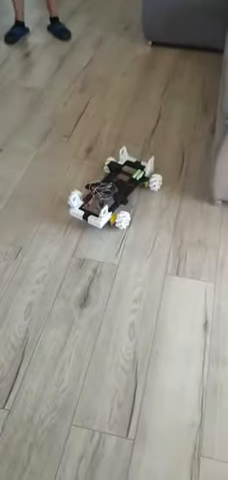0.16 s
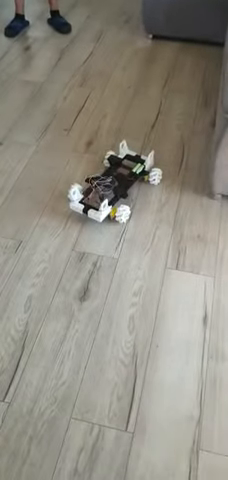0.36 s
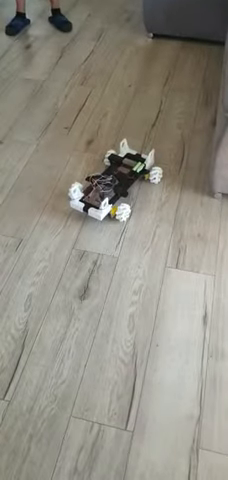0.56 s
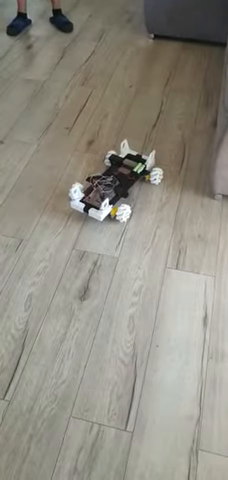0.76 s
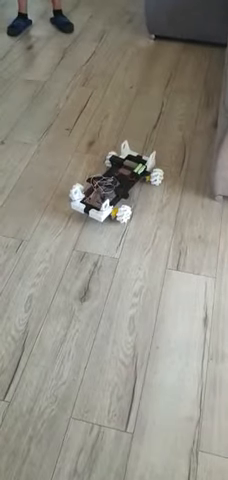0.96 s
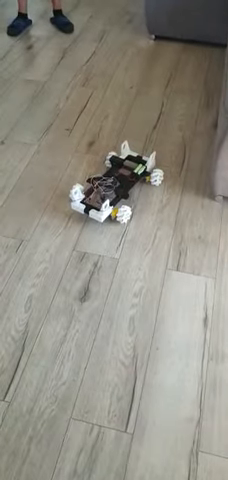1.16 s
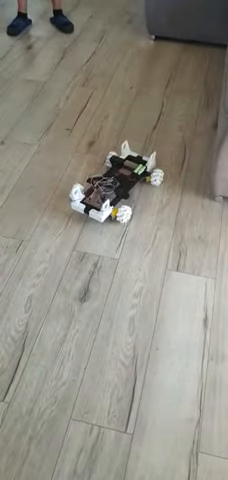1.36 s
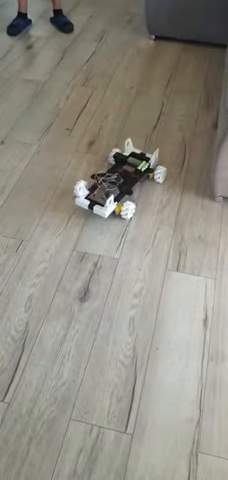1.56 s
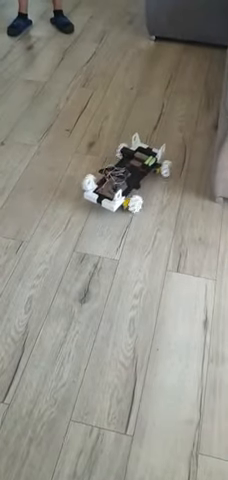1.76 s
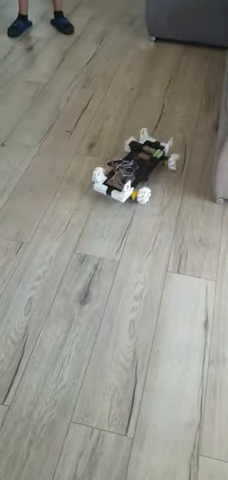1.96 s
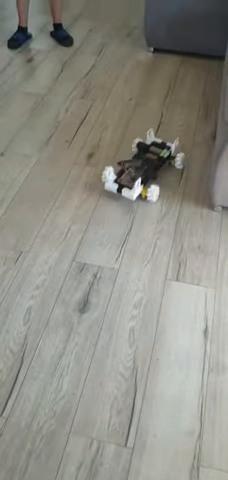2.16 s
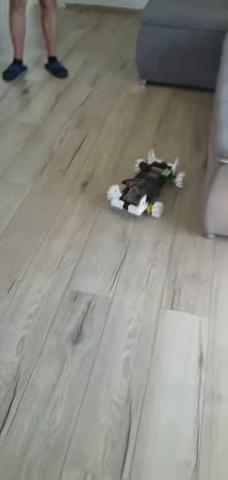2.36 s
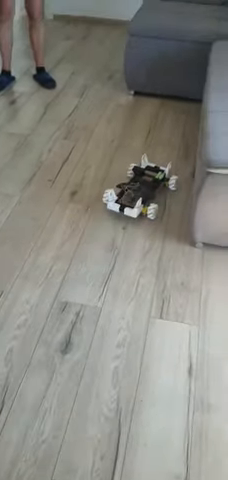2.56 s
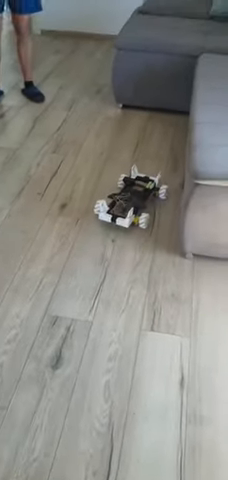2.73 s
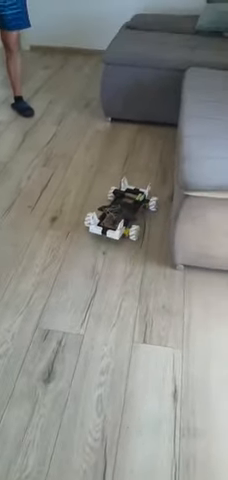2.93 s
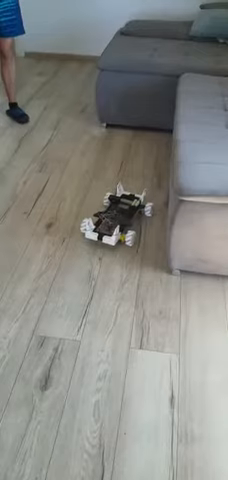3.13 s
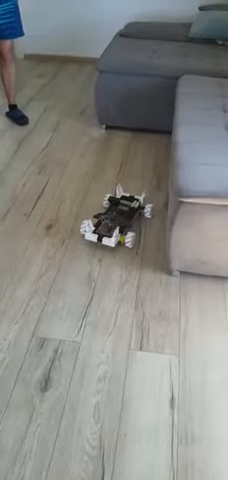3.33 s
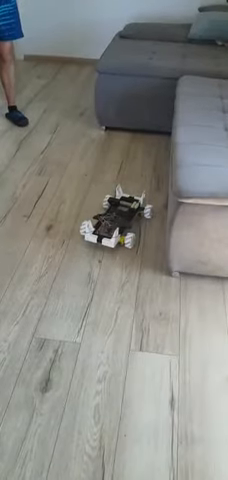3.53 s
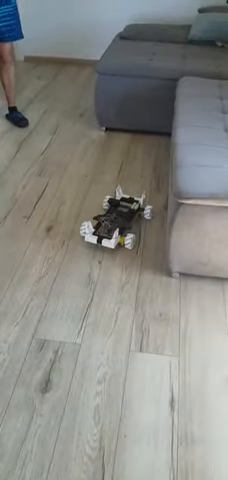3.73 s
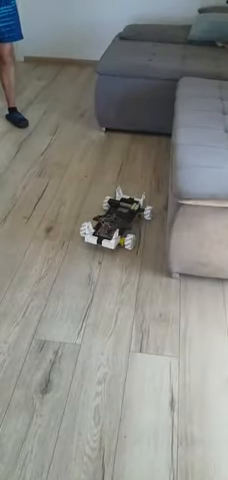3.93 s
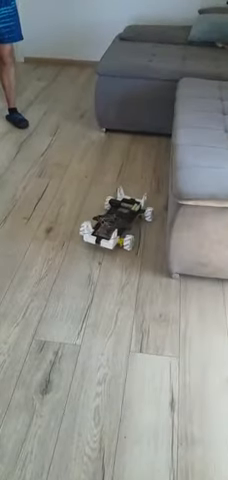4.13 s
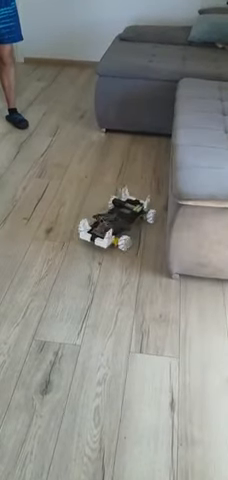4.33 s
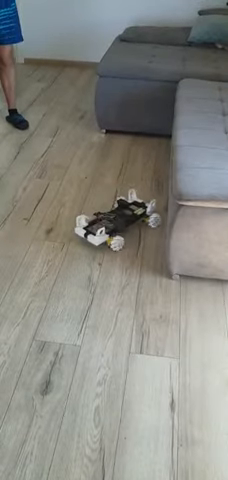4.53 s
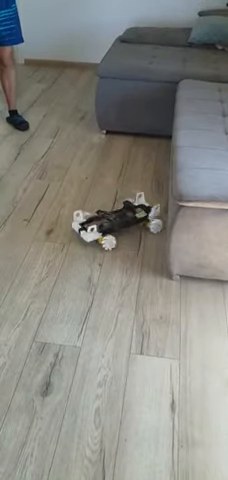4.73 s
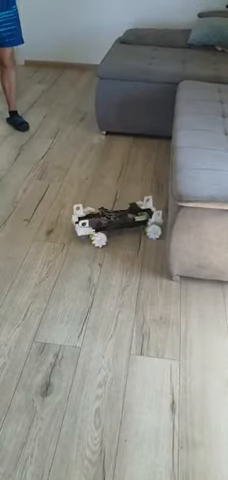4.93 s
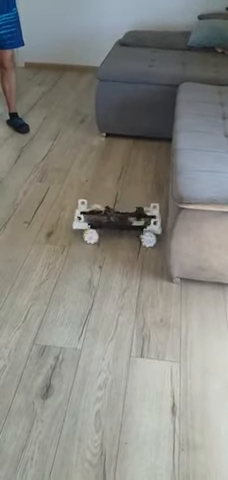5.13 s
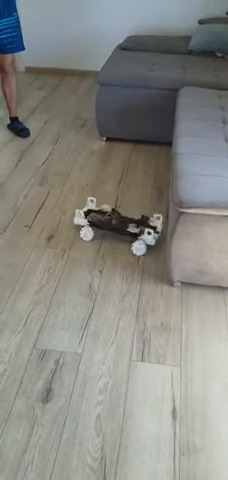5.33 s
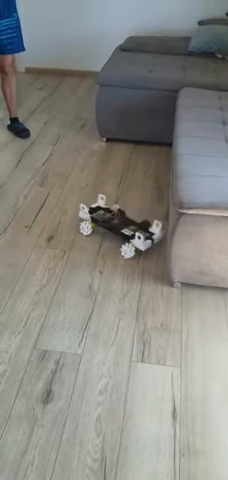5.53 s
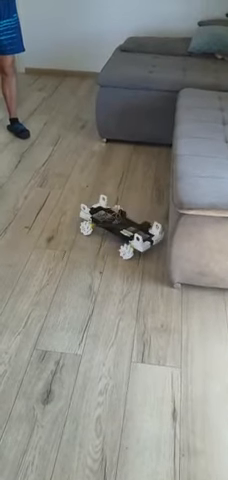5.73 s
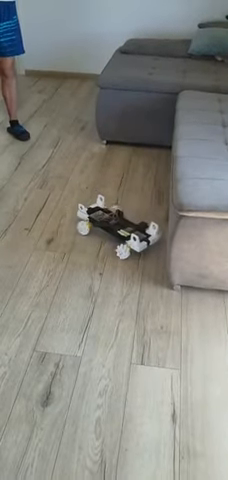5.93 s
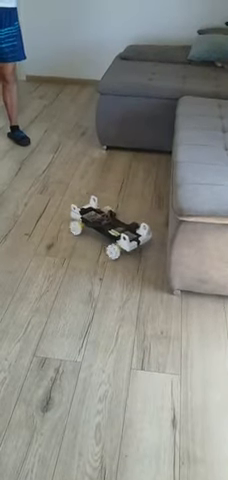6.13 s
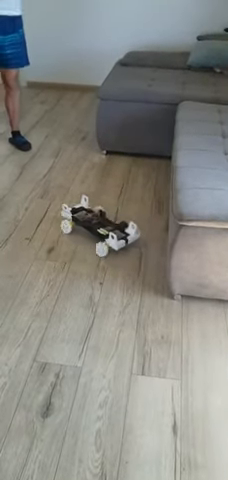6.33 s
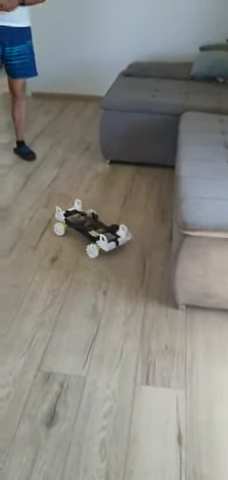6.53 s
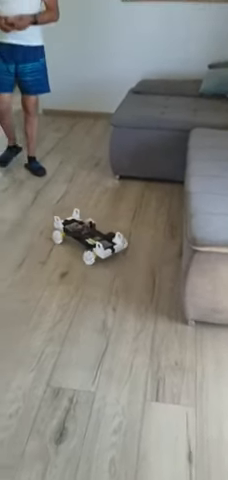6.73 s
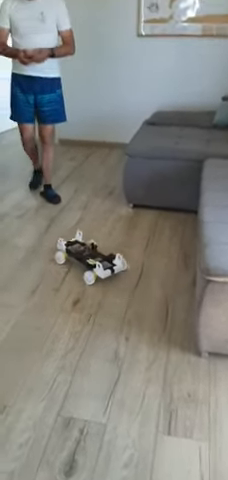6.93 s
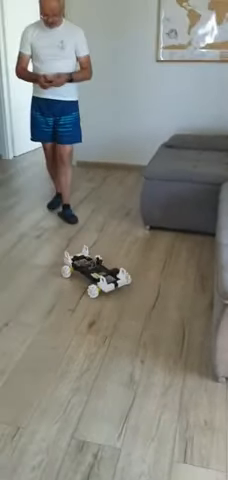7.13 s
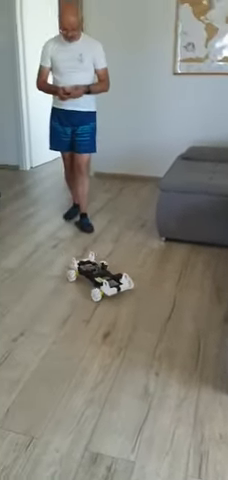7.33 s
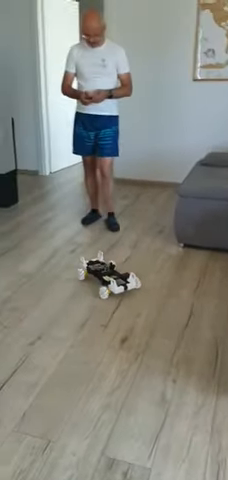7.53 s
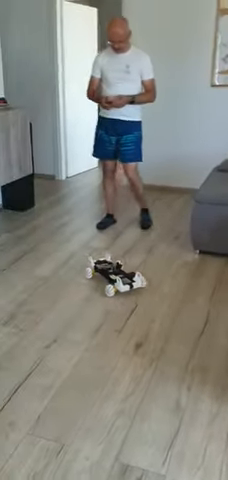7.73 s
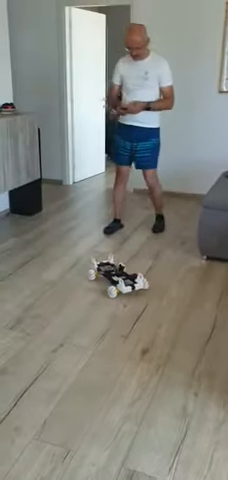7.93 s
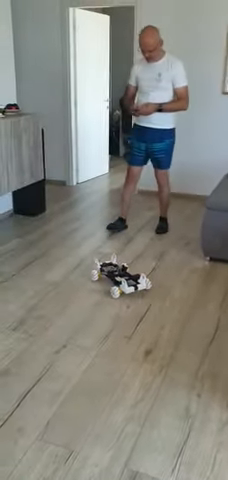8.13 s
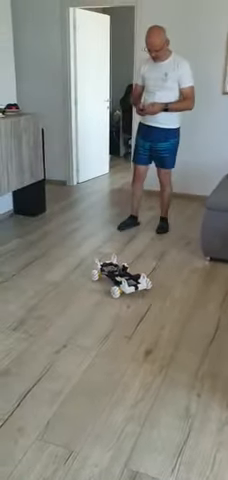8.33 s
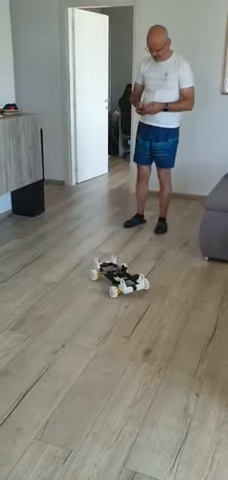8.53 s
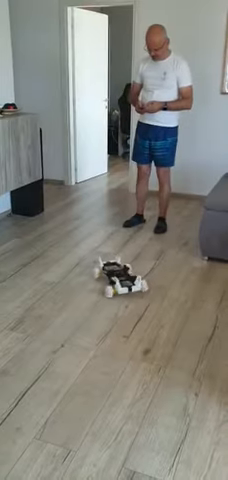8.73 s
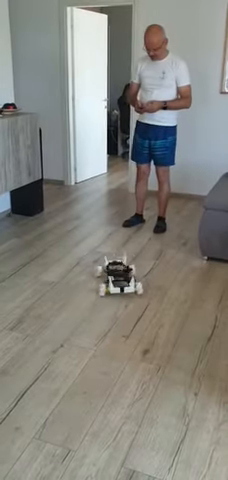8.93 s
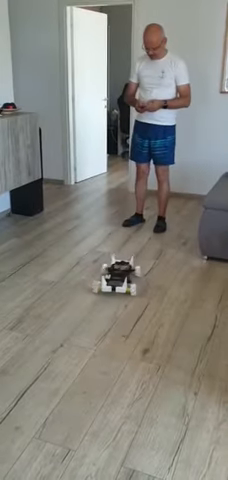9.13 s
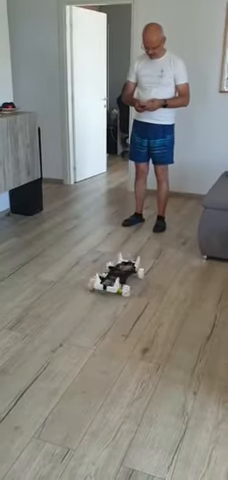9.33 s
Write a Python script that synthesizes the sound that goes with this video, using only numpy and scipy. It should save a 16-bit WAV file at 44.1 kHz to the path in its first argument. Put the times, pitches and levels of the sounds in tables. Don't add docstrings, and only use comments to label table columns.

```python
import sys
import numpy as np
from scipy import signal
from scipy.fft import rfft, irfft, next_fast_len
from scipy.io import wavfile
from scipy.ndimage import map_coordinates

SR = 44100
rng = np.random.default_rng(int(sys.argv[2]) if len(sys.argv) > 2 else 0)


def unload_audio(sound):
    columns = np.transpose(np.atleast_2d(sound))
    steps = np.round(np.clip(columns, -1, 1) * 32767)
    wavfile.write(sys.argv[1], SR, steps.astype(np.int16))


def convert_level_to_amplitude(level_db):
    exponent = np.asarray(level_db, float) / 20
    return 10 ** exponent


N = 418068

# (time [s], housing ring level [dB], tooth mesh re ring [dB], sizzle re ring [dB],
# chassis rumble level [dB], board drone level [dB])
DRIVES = [
    [(0.0, -68, -3, -21.5, -73, -77), (0.058, -75, -10, -28.5, -75.5, -79), (0.09, -80, -13, -20, -76, -78),
     (0.286, -103, 3, -5, -74, -76.5), (0.3, -100, 16, -3, -71, -71)],
    [(1.33, -83, 12, -5, -74.5, -70), (1.362, -41.5, -5, -10.5, -76, -68.5), (1.422, -50, 8, -13, -70, -64),
     (1.454, -36, -1, -8, -63, -59.5), (1.51, -40.5, 0, -10.5, -51, -51),
     (1.538, -28.5, -10, -9, -46.5, -52), (1.584, -36, 1.5, -14.5, -45.5, -51),
     (1.608, -31, -6, -10.5, -44, -47.5), (1.66, -38, -2.5, -9.5, -47, -53.5),
     (1.674, -29.5, -4, -15, -42.5, -47.5), (1.724, -35.5, -3.5, -11, -44.5, -48.5),
     (1.952, -26, -6, -9.5, -40, -48.5), (2.05, -31.5, -4.5, -9, -46, -48.5),
     (2.18, -30.5, -5.5, -10, -42.5, -49.5), (2.278, -31.5, -4, -9, -45.5, -48),
     (2.358, -35.5, -4.5, -12, -50.5, -51), (2.612, -62.5, 5.5, -15.5, -60.5, -67.5),
     (2.798, -69, 4, -23, -77, -78), (3.0, -104, -1, -10, -83, -80.5)],
    [(4.0, -73, -3, -17, -76.5, -72), (4.028, -42.5, -6, -20, -75, -71.5),
     (4.082, -52.5, 5, -12.5, -70, -63), (4.122, -31, -6.5, -12.5, -65, -68.5),
     (4.176, -44, 1, -8, -55.5, -57), (4.21, -23.5, -11, -13, -43, -48), (4.234, -36, -3, -12, -37, -47),
     (4.284, -30.5, -6, -9, -44, -48.5), (4.338, -32, -2, -12.5, -40.5, -43),
     (4.41, -29.5, -4.5, -9, -39, -48), (4.606, -30.5, -4, -9, -46, -46.5),
     (4.788, -32.5, -2, -13, -43, -47), (4.97, -31, -4, -7, -42, -45), (5.116, -31.5, -2, -12, -45, -54),
     (5.312, -31.5, -2, -9.5, -40.5, -46), (5.426, -29.5, -5, -9.5, -40.5, -48),
     (5.514, -43, 2, -15.5, -55, -54), (5.592, -51, 0.5, -11.5, -62.5, -62),
     (5.76, -70, -2, -19, -69, -73.5)],
    [(5.76, -64, 8, -20, -64, -66), (5.77, -54, 1, -27, -61.5, -66), (5.85, -44.5, 6, -20, -60.5, -55),
     (5.87, -32, -9, -21.5, -61, -61.5), (5.92, -42.5, 1, -12, -60.5, -56),
     (5.96, -32, -7.5, -8.5, -47, -54), (6.05, -35, 1, -14, -46.5, -54),
     (6.25, -30, -6.5, -9.5, -42.5, -51), (6.3, -32.5, 0.5, -6, -42.5, -44.5),
     (6.32, -22.5, -10, -10, -40.5, -44), (6.38, -31, -7, -12.5, -36.5, -45),
     (6.47, -26, -9.5, -12.5, -51, -46.5), (6.61, -35.5, 2.5, -6, -50, -50.5),
     (6.63, -24, -16, -13, -42, -51), (6.66, -32.5, -4, -8, -45, -44.5), (6.79, -28, -5.5, -9, -40, -43),
     (7.1, -31.5, -2.5, -11.5, -47.5, -44.5), (7.22, -26, -8.5, -10, -38, -33),
     (7.28, -30.5, -4, -9.5, -39, -40), (7.49, -30, -3, -10, -42, -37.5),
     (7.62, -27.5, -5, -8.5, -44.5, -39.5), (7.74, -39.5, 5, -12.5, -48, -48.5),
     (7.85, -47.5, 5.5, -15, -48.5, -49.5), (8.0, -50.5, -1.5, -9.5, -63, -61),
     (8.2, -77, -2, -9, -80, -80)],
    [(8.2, -69, -3, -1, -76.5, -78), (8.448, -62, 6.5, -4.5, -66.5, -68), (8.52, -41.5, 3, -16, -61.5, -60),
     (8.562, -40.5, 6.5, -7.5, -58.5, -60), (8.584, -33.5, 0, -10, -54.5, -55),
     (8.656, -36.5, 0, -10.5, -39, -49), (8.676, -29.5, -1, -10.5, -40, -54),
     (8.712, -36.5, -1, -6.5, -40.5, -43.5), (8.758, -32, -2, -8.5, -36.5, -41.5),
     (8.826, -31.5, -1.5, -8, -42, -41), (9.136, -35, -1.5, -10, -45, -45),
     (9.212, -30.5, -2, -9, -39.5, -45), (9.404, -31, -2, -9.5, -44, -43.5),
     (9.468, -34, -2, -10, -41, -49.5), (9.48, -27, -7, -15, -48, -44.5)],
]
# (time [s], peak level [dB], plastic clack re peak [dB])
LANDINGS = [(1.348, -29.5, -5), (1.442, -24, 3), (1.516, -21, -22), (1.67, -21.5, -1.5), (1.695, -24.5, -3),
            (1.777, -32, 2), (1.85, -18, -14), (1.954, -25.5, 2), (2.014, -26, -1), (2.153, -22.5, -1),
            (2.26, -22.5, 4), (2.315, -19.5, -1), (2.455, -38.5, -3.5), (4.014, -44.5, 2.5),
            (4.108, -23, -0.5), (4.181, -18, -2.5), (4.273, -22, 4.5), (4.352, -31.5, 3),
            (4.428, -19, -8.5), (4.555, -26.5, 10.5), (4.608, -30.5, 8.5), (4.661, -36.5, -11.5),
            (4.705, -30, 5), (4.736, -25.5, 9.5), (4.76, -33.5, 6.5), (4.797, -33.5, 3), (4.867, -22, -1.5),
            (4.937, -23.5, 8), (5.004, -27.5, 4.5), (5.084, -37, 0.5), (5.164, -35.5, 16.5),
            (5.203, -33.5, 7), (5.229, -24, 0), (5.253, -38, -11.5), (5.292, -28, 2.5),
            (5.314, -23.5, -3.5), (5.772, -50.5, 0), (5.809, -42.5, 2), (5.864, -27, -0.5),
            (5.922, -34, 3.5), (5.944, -20, -1.5), (6.083, -26.5, 4.5), (6.2, -25.5, 7), (6.246, -18, -4),
            (6.303, -16, 3.5), (6.463, -32.5, 6), (6.515, -30, 6), (6.58, -26, 3.5), (6.623, -19, 0),
            (6.676, -18, 1), (6.703, -28.5, 0), (6.726, -21, -5), (6.768, -27, -2.5), (6.824, -26, 1),
            (6.873, -25, 3), (6.976, -32.5, 3.5), (7.018, -18, 4.5), (7.089, -26, 1.5), (7.122, -20.5, -2),
            (7.224, -31.5, -5), (7.272, -26, -5), (7.468, -24.5, 0), (7.567, -26, -5), (8.41, -46, -7),
            (8.495, -28.5, -1), (8.533, -28, 3), (8.578, -23.5, -3.5), (8.657, -20.5, -11),
            (8.738, -22, 2.5), (8.802, -20, -1), (8.91, -28.5, 11.5), (8.935, -26, -3.5),
            (9.075, -24.5, -5), (9.143, -29, -1), (9.269, -26, -11)]
# (time [s], peak level [dB])
SNAPS = [(1.3357, -57.5), (1.3552, -41), (1.4246, -29), (1.5194, -18), (1.6695, -23), (1.7482, -19),
         (2.722, -48), (4.0078, -56), (4.022, -35), (4.1046, -26), (4.1756, -18.5), (4.8721, -17),
         (5.0612, -12), (5.7704, -40.5), (5.8414, -35), (5.866, -25), (5.9207, -27), (5.9427, -16.5),
         (6.1606, -17), (6.1855, -14.5), (6.2402, -13.5), (6.303, -15.5), (6.4134, -14), (6.4648, -16.5),
         (6.6238, -13), (6.7728, -17), (7.167, -9.5), (7.5214, -30), (7.7844, -30.5), (8.4542, -45.5),
         (8.493, -39), (8.511, -31.5), (8.6567, -18), (8.9202, -24)]
# (time [s], level [dB])
SLIDES = [
    [(7.95, -61.5), (7.992, -66.5), (8.02, -62.5), (8.138, -71.5), (8.31, -71), (8.346, -66), (8.478, -62),
     (8.52, -49)],
]
# (frequency [Hz], density [dB per Hz])
HOUSING = [(2650, -30.5), (4500, -12.5), (5150, -9.5), (5580, -2), (5830, -1), (6760, -6), (7500, -11.5),
           (7900, -26.5), (10300, -42), (17400, -120)]
# (frequency [Hz], density [dB per Hz])
MESH = [(650, -29.5), (1100, -16), (1590, -8), (2740, 2.5), (3360, -0.5), (4700, -6.5), (6110, -31.5),
        (10300, -120)]
# (frequency [Hz], density [dB per Hz])
SIZZLE = [(4850, -24.5), (8250, -12.5), (8680, -5), (9370, -2.5), (10900, -8), (11900, -5), (12600, -9),
          (13600, -5.5), (14600, -22), (15600, -22.5)]
# (frequency [Hz], width [Hz], level [dB])
CHASSIS = [(550.4, 100, -3.5), (656, 151, 2), (811, 187, 0), (978, 150, -3.5), (1410, 770, -14.5)]
# (frequency [Hz], width [Hz], level [dB])
BOARDS = [(140, 58, -13), (200, 60, -6.5), (309, 99, -5.5), (407.5, 70, 0.5), (492, 90, -2)]
# (frequency [Hz], density [dB per Hz])
FELT = [(410, -35), (700, -5.5), (919, 1), (1190, -4), (2280, 3.5), (6200, -7.5), (8240, -6.5),
        (13000, -12), (15600, -17)]
# (frequency [Hz], density [dB per Hz])
MURMUR = [(15, -36), (25, -21.5), (49, -8.5), (101, -9.5), (174, -18), (369, -27.5), (434, -35.5),
          (483, -29), (538, -33.5), (763, -29.5), (1240, -33), (1500, -37), (2780, -46), (8610, -51),
          (15600, -44)]
# (time [s], level [dB])
MURMUR_LEVEL = [(0.0, -55), (0.84, -58), (1.9, -56), (2.51, -54), (2.95, -59), (3.43, -59), (4.88, -59.5),
                (5.83, -61), (6.23, -58.5), (7.52, -62), (8.0, -59.5), (8.74, -67), (9.48, -63)]
# (frequency [Hz], rms level [dB])
HUM = [(59.2, -70), (96.9, -67.5), (118.4, -71), (489.9, -91), (737.5, -95), (985.1, -85.5), (1486, -91.5)]
# (frequency [Hz], 60 dB decay time [s])
ROOM_DECAY = [(200, 0.4), (1000, 0.45), (5000, 0.35), (12000, 0.23)]
# (frequency [Hz], correlation [-1..1])
NEAR_ALIKE = [(60, 0.84), (180, 0.93), (550, 0.35), (1650, 0.042), (4970, 0.12), (15000, 0.056)]
# (frequency [Hz], correlation [-1..1])
MURMUR_ALIKE = [(60, 0.91), (180, 0.92), (550, 0.57), (1650, 0.17), (4970, -0.28), (15000, -0.01)]
# (frequency [Hz], left over right [dB])
NEAR_LEAN = [(60, 4), (240, 1), (950, 3), (3770, 0), (15000, 1.0)]
# (frequency [Hz], left over right [dB])
MURMUR_LEAN = [(60, 4), (240, 7.5), (950, 6.5), (3770, 3.5), (15000, 7.5)]


def unit(x):
    return x / np.sqrt(np.mean(x ** 2) + 1e-20)


def along(points, hz):
    f, v = np.transpose(points)
    return np.interp(np.log(hz + 1), np.log(f + 1), v)


def curve(tables, index):
    t = np.arange(N) / SR
    out = np.full(N, -120.)
    for rows in map(np.array, tables):
        on = (t >= rows[0, 0]) & (t <= rows[-1, 0])
        out[on] = np.interp(t[on], rows[:, 0], rows[:, index])
    return out


def wobble(rate):
    knots = rng.standard_normal(int(N * rate / SR) + 4)
    return map_coordinates(knots, [np.arange(N) * rate / SR])


def filtered(x, response):
    m = next_fast_len(N + SR // 2)
    return irfft(rfft(x, m) * response(np.fft.rfftfreq(m, 1 / SR)), m)[..., :N]


def coloured(x, spectrum):
    return unit(filtered(x, lambda hz: convert_level_to_amplitude(along(spectrum, hz))))


def resonant(modes):
    def response(f):
        total = 0
        for k, (centre, width, db) in enumerate(modes):
            mode = 1j * f * width / (centre * centre - f * f + 1j * f * width)
            total = total + (-1) ** k * convert_level_to_amplitude(db) * mode
        return total
    return response


def paired(pair, alike, lean):
    def mixing(hz):
        angle = np.arccos(np.clip(along(alike, hz), -1, 1)) / 2
        return np.sqrt(2) * np.array([np.cos(angle), np.sin(angle)])

    mid, side = filtered(pair, mixing)
    tilt = lambda hz: convert_level_to_amplitude(np.outer([.5, -.5], along(lean, hz)))
    return filtered(np.array([mid + side, mid - side]), tilt)


def chatter(rate, spread_db, smooth):
    size_db = spread_db * np.clip(rng.standard_normal(N), -2, 2)
    ticks = (rng.random(N) < rate / SR) * rng.choice([-1, 1], N) * convert_level_to_amplitude(size_db)
    smooth = np.clip(smooth, 0, 1)
    return np.sqrt(1 - smooth) * unit(ticks) + np.sqrt(smooth) * rng.standard_normal(N)


def bursts(times, db, t60, rise, length=1500):
    out = np.zeros(N + int(length))
    t = np.arange(int(length)) / SR
    shape = convert_level_to_amplitude(-60 * t / t60) * (1 - np.exp(-t / rise))
    for s, level in zip(times, db):
        crack = shape * rng.standard_normal(len(t))
        out[round(s * SR):][:len(t)] += convert_level_to_amplitude(level) * crack / np.linalg.norm(crack)
    return out[:N]


def gears():
    ring_db = curve(DRIVES, index=1)
    surge = convert_level_to_amplitude(0.66 * wobble(12) + 1.3 * wobble(45))
    teeth = surge * chatter(rate=1200, spread_db=3.5, smooth=.4)
    rattle = convert_level_to_amplitude(ring_db - 1.5) * coloured(teeth, HOUSING)
    rattle += convert_level_to_amplitude(ring_db + curve(DRIVES, index=2) - 3.2) * coloured(teeth, MESH)
    rattle += convert_level_to_amplitude(ring_db + curve(DRIVES, index=3) - 1.2) * coloured(teeth, SIZZLE)

    s, db, clack_db = np.transpose(LANDINGS)
    clacks = bursts(s, db + clack_db, t60=0.032, rise=.003)
    snap_s, snap_db = np.transpose(SNAPS)
    snaps = bursts(snap_s, snap_db, t60=0.027, rise=.0015)

    def plastic(hz):
        return convert_level_to_amplitude(along(HOUSING, hz) + 28) + convert_level_to_amplitude(along(MESH, hz) + 18.5) + convert_level_to_amplitude(along(SIZZLE, hz) + 15)
    return rattle + filtered(clacks + snaps, plastic)


def rollers():
    body, boards = resonant(CHASSIS), resonant(BOARDS)
    grain = convert_level_to_amplitude(1.6 * wobble(14)) * chatter(rate=150, spread_db=3, smooth=.3)
    rumble = unit(filtered(grain, body))
    joints = convert_level_to_amplitude(0.58 * wobble(14)) * chatter(rate=78, spread_db=2.5, smooth=.6)
    drone = unit(filtered(joints, boards))
    rolling = convert_level_to_amplitude(curve(DRIVES, index=4) - 1.0) * rumble + convert_level_to_amplitude(curve(DRIVES, index=5) - 1.3) * drone

    s, db, _ = np.transpose(LANDINGS)
    thumps = np.zeros(N)
    thumps[np.round(s * SR).astype(int)] = convert_level_to_amplitude(db)
    thumps += 0.66 * bursts(s + .004, db, t60=0.037, rise=.002)
    return rolling + convert_level_to_amplitude(33.5) * filtered(thumps, body) + convert_level_to_amplitude(27.5) * filtered(thumps, boards)


def room(x, direct, size=4096):
    direct = np.clip(direct, 0, 1)
    count = N // size + 2
    hz, t, z = signal.stft(rng.standard_normal((count, 2, SR // 4)), SR, nperseg=256)
    decay = convert_level_to_amplitude(-60 * t / along(ROOM_DECAY, hz)[:, None])
    tails = signal.istft(z * decay, SR, nperseg=256)[1]
    tails *= np.sqrt(1 - direct) / np.linalg.norm(tails, axis=2, keepdims=True)

    paths, lag = np.arange(count), rng.integers(0, 60, count)
    tails[paths, lag % 2, lag] += np.sqrt(direct)
    tails[paths, 1 - lag % 2, 0] += np.sqrt(direct)

    x = np.pad(x, (size, 2 * size))
    out = np.zeros((2, N + 4 * size + SR))
    fade = np.sin(np.pi * np.arange(2 * size) / (2 * size))
    for k in range(count):
        piece = x[k * size:][:2 * size] * fade
        heard = signal.fftconvolve(piece[None], tails[k], axes=1)
        out[:, k * size:][:, :heard.shape[1]] += heard
    return out[:, size:size + N]


def household():
    level_db = curve([MURMUR_LEVEL], index=1)
    air = unit(filtered(rng.standard_normal((2, N)), lambda hz: convert_level_to_amplitude(along(MURMUR, hz))))
    t = np.arange(N) / SR
    hum = np.zeros(N)
    for hz, db in HUM:
        hum += convert_level_to_amplitude(db + 3.3 * wobble(4.2)) * np.sin(2 * np.pi * hz * t + 1.5 * wobble(4.3))
    murmur = convert_level_to_amplitude(level_db - 5.0 + 1.0 * wobble(4.2)) * air
    return paired(murmur + [hum, 0 * hum], MURMUR_ALIKE, MURMUR_LEAN)


def slipper():
    slips = chatter(rate=2500, spread_db=1.5, smooth=.7)
    return convert_level_to_amplitude(curve(SLIDES, index=1) + 6) * coloured(slips, FELT)


def scene():
    near = room(gears() + slipper(), direct=0.44) + room(rollers(), direct=0.58)
    return convert_level_to_amplitude(-0.52) * paired(near, NEAR_ALIKE, NEAR_LEAN) + household()


def top_cut(x):
    return signal.sosfilt(signal.butter(12, 15720, fs=SR, output="sos"), x)


def record(dry):
    mix = filtered(dry, lambda hz: hz < 15750)
    return top_cut(mix)


dry = scene()
out = record(dry)
unload_audio(out)
```